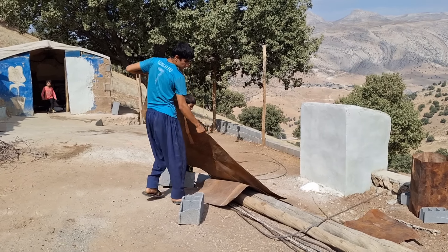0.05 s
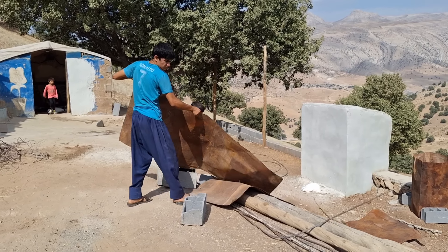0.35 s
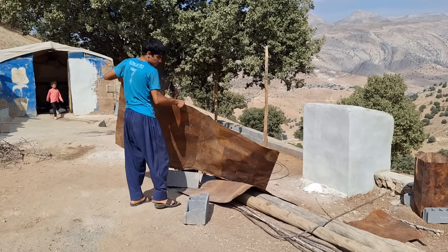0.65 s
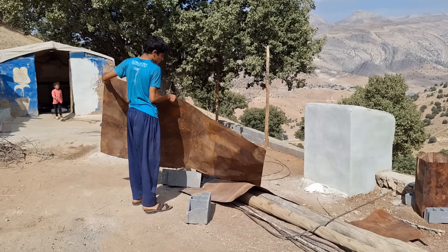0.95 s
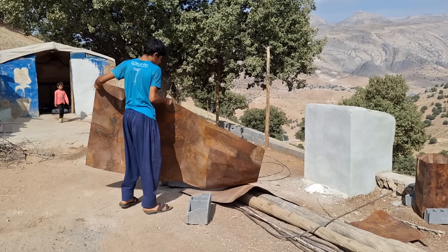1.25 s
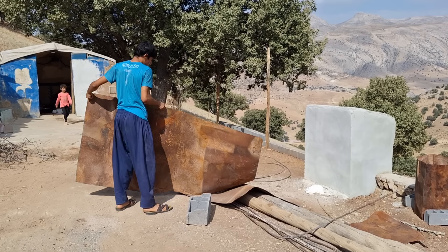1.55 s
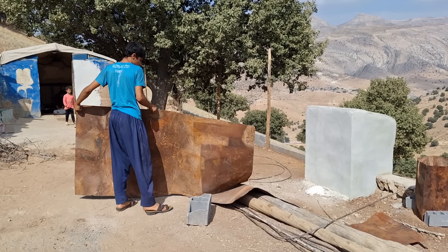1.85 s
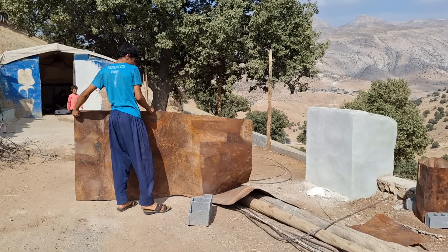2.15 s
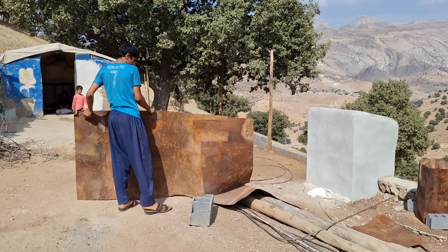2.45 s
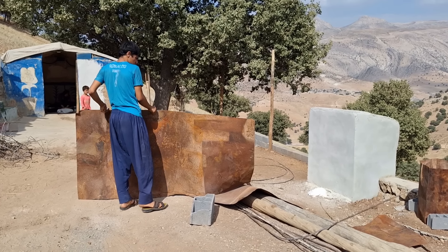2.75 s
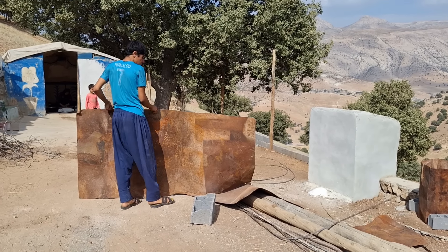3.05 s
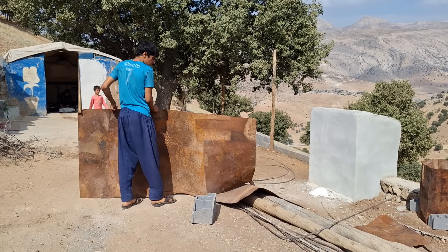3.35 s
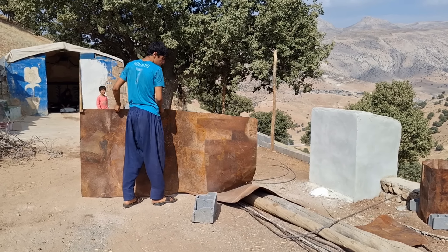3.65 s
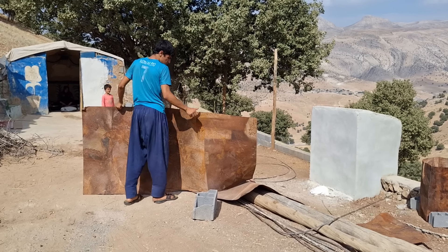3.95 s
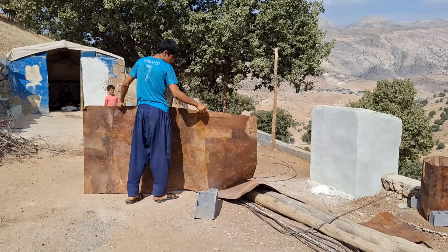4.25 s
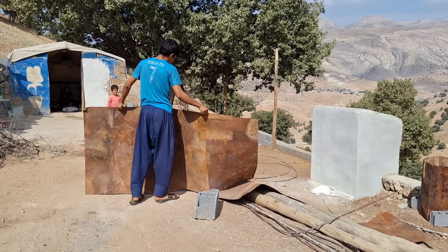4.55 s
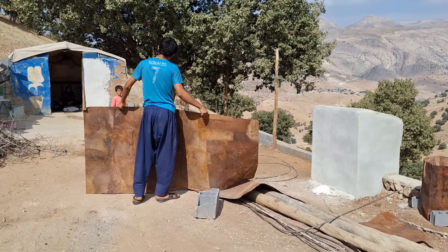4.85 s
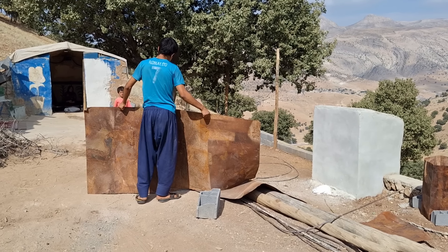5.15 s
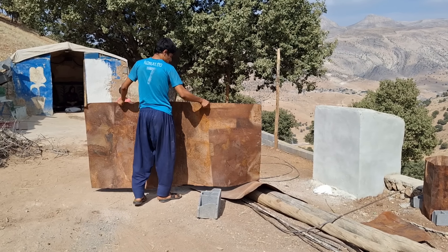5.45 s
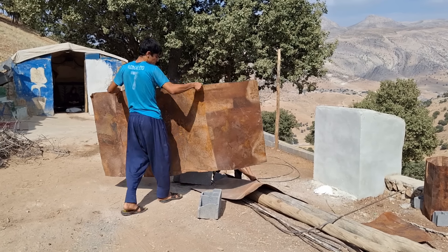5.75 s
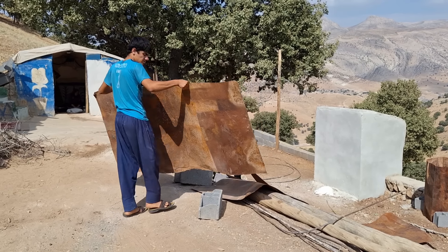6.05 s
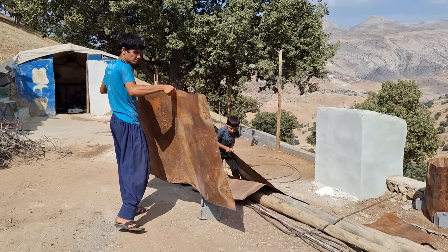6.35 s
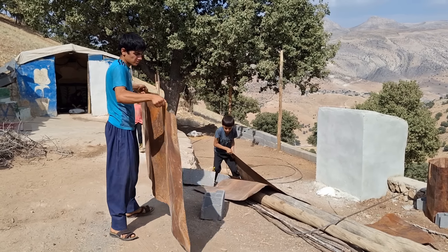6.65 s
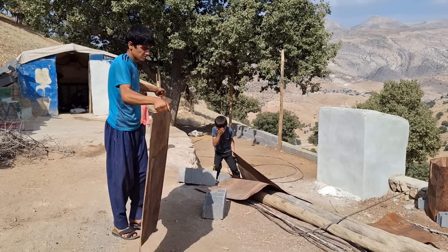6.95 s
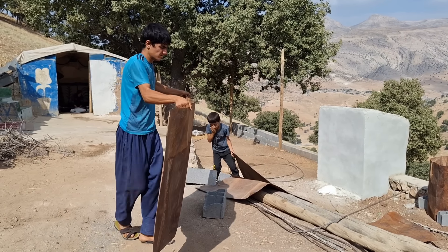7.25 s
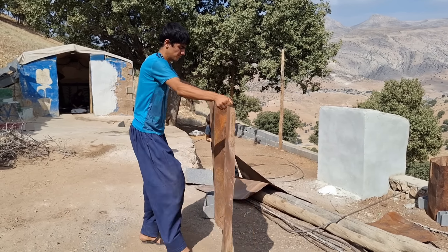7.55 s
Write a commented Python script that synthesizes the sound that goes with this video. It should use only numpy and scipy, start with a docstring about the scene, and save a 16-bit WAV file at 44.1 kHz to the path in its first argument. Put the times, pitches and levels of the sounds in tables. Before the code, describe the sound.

From the start a rusty iron sheet is dragged over a pile of sheets, booming, ringing and rasping, with short gritty scratches. It clangs loudly at about 1.1 and 1.5 seconds. From 1.9 to 3.2 seconds a sheep or goat, slightly to the right, gives one long, buzzy, wavering bleat that sags in pitch, while the sheet flexes with low booms. Quieter shifting and small ticks follow until about 5 seconds. At 5.2 the second drag begins with a hard grinding rasp, a clang near 5.6, and a brief, rough, high squeal around 6 seconds. The sheet settles with a softer boom, a scratch at 6.5 and a light knock near 7.1. Light wind rumbles and thumps on the microphone, mostly on the left, from 2 seconds on and strongest between 4 and 6, over a faint outdoor hush.

```python
"""Dragging a rusty iron sheet

In an open hillside yard, a rusty iron sheet is dragged, knocked and laid down on a pile of sheets.
Countless tiny slips make it boom, ring and rasp, and once its edge sticks and slips in a squeal.
Between two drags a sheep or goat gives one long, buzzy, wavering bleat: pulses ringing in its throat.
A light wind buffets the microphone over the faint hush of the hillside."""
import sys
import numpy as np
from scipy import signal
from scipy.fft import rfft, irfft
from scipy.io import wavfile
from scipy.ndimage import uniform_filter1d

SR = 44100
rng = np.random.default_rng(int(sys.argv[2]) if len(sys.argv) > 2 else 0)


def transcribe(u):
    """Save the signal u as a 16-bit wav file named by the first command-line argument.

    u: samples, shape (n,) or (channels, n), limited to [-1, 1]; the rate is SR.
    q: integer samples, one column per channel.
    """
    v = np.clip(np.atleast_2d(u).T, -1, 1)
    q = np.round(v * 32767).astype(np.int16)
    wavfile.write(sys.argv[1], SR, q)


N = 334710
T, HZ = np.arange(N) / SR, np.fft.rfftfreq(N, 1 / SR)

# Levels in all tables are relative. A fade is the time a sound takes to fall by 60 dB.
# The tone of the sheet's body (low) and edge (high). Each row: frequency in Hz, level in dB.
BODY_TONE = [(50, -13), (90, 0), (140, 4.5), (300, 1.5), (420, -3.5), (520, -8.5), (660, 2), (900, -1),
             (1150, -7.5), (1400, -6)]
EDGE_TONE = [(1800, -6.5), (2150, -14), (2600, -11.5), (3300, -12.5), (4500, -16.5), (6300, -24.5),
             (8400, -32.5), (9200, -31.5), (12500, -36), (16000, -41)]


def sheet_spectrum(grains_per_s, spread_db, grain_db, ripple_db=2):
    """The left and right spectrum of the sheet, shaken by tiny slips and some coarser grains."""
    # The main peaks and dips in the sheet's ring. Each row: frequency in Hz, width in Hz, gain in dB.
    ring_colour = [(157, 25, -1), (283, 25, 1.5), (770, 27, 3), (828, 24, 1.5), (980, 40, 2.5),
                   (1275, 16, 5.5), (1540, 55, -7), (1858, 66, 2.5), (2660, 77, 5), (3212, 50, 5.5)]
    # How alike left and right are. Each row: frequency in Hz, likeness from 0 to 1.
    likeness = [(60, .995), (300, .995), (750, .96), (1300, .85), (2200, .6), (4000, .65), (7000, .35),
                (14000, .4)]
    # How far the left side is ahead. Each row: frequency in Hz, phase in radians.
    left_lead = [(100, -0.8), (400, 0.52), (800, 0.55), (1100, 0.95), (1400, 1.66), (1900, 2.5), (2600, -2),
                 (3600, 1.2), (5500, 1.77), (8000, -1.7)]
    # How much louder the left side is. Each row: frequency in Hz, gap in dB.
    left_louder = [(80, 3), (250, 0), (750, 2), (1400, 3), (2300, 1.5), (3600, -2), (10000, -6.5)]
    sizes = amp(spread_db * np.minimum(rng.exponential(1, N), 4.5))
    grains = sizes * (rng.random(N) < grains_per_s / SR) * rng.standard_normal((2, N))
    left, other = rfft(rng.standard_normal((2, N)) + amp(grain_db) * grains / rms(grains))
    same, side = over_frequency(likeness), amp(over_frequency(left_louder) / 2)
    right = (same * left + np.sqrt(1 - same ** 2) * other) * np.exp(-1j * over_frequency(left_lead))
    ripple = uniform_filter1d(rng.standard_normal(len(HZ)), size=450)  # the crowded higher resonances
    colour_db = peaks_and_dips(ring_colour) + ripple_db * ripple / rms(ripple) * HZ / (HZ + 900)
    tone = amp(over_frequency(BODY_TONE + EDGE_TONE) + colour_db) * high_pass(40, 2)
    spectrum = np.array([left * side, right / side]) * tone
    return spectrum / rms(irfft(spectrum.mean(0), N))


def sliding(judder_db=0.93, judder_hz=35, lurch_db=0.23, lurch_hz=9):
    """The dragged sheet booms and rings; its edge rasps and hisses, lurching and juddering as it goes."""
    # Pulls and shoves over the pile. Each row: start, rise, hold and fade in seconds,
    # then the levels of boom, ring, rasp and grit in dB.
    slides = [(-.05, 0.036, 0.1, 1.1, -45, -43, -40.5, -49.5),
              (0.113, 0.059, .22, 0.95, -35.5, -44.5, -34.5, -46),
              (0.303, 0.12, 0.26, 2.2, -36.5, -33, -36.5, -48),
              (0.756, .15, 0.049, 0.49, -34.5, -34, -35, -48), (0.986, .08, 0.46, 1.1, -35, -43, -55, -62),
              (1.183, 0.15, 0.082, 0.24, -38, -35.5, -38.5, -48),
              (1.506, 0.15, .12, 1, -45, -49, -59.5, -72), (1.878, 0.02, 0.018, 1.2, -58, -46.5, -49, -73),
              (2.016, 0.018, 0.35, 1.3, -49, -54.5, -61, -76),
              (2.417, 0.07, 0.032, 0.65, -39.5, -53, -70, -82),
              (2.57, .035, 0.037, 1.14, -38.5, -43, -51, -66),
              (2.685, 0.11, 0.3, 0.76, -48.5, -56, -58, -72),
              (3.444, 0.057, 0.058, 0.97, -55.5, -68, -90, -100),
              (3.673, 0.021, 0.055, 1.5, -51, -57, -68.5, -75.5),
              (3.836, .13, 0.087, 1.9, -42.5, -47.5, -53, -62.5),
              (4.2, 0.09, 0.042, 0.3, -50, -54.5, -62, -73), (4.492, 0.11, 0.1, 0.9, -59.5, -68, -81, -92),
              (4.817, 0.061, 0.17, 0.85, -56, -67, -71.5, -84),
              (5.227, .13, .11, 0.23, -32.5, -34, -32, -47.5),
              (5.448, 0.075, 0.22, 1.06, -31, -38, -48.5, -63),
              (5.66, 0.29, .36, 0.73, -39.5, -44.5, -42.5, -50),
              (6.258, .15, .12, 0.89, -34.5, -44, -57.5, -82),
              (6.797, 0.097, 0.097, .8, -60.5, -78.5, -98.5, -88.5),
              (7.076, 0.061, 0.042, 1.02, -41, -49, -58.5, -67.5)]
    # The centres of the boom, ring, rasp and grit bands in Hz.
    centres = [250, 900, 3200, 9500]
    borders_hz = [100, 500, 1600, 5800, 16000]
    spectrum = sheet_spectrum(grains_per_s=700, spread_db=2.5, grain_db=-8)
    speeds = np.array([push(*row[:4]) for row in slides])
    levels = np.sqrt(amp([row[4:] for row in slides]).T ** 2 @ speeds ** 2)
    judder = amp(judder_db * waver(judder_hz) + lurch_db * waver(lurch_hz))
    out = np.zeros((2, N))
    for k, level in enumerate(levels):
        zone = irfft(spectrum.mean(0) * (HZ > borders_hz[k]) * (HZ < borders_hz[k + 1]), N)
        out += irfft(spectrum * band(centres, k), N) * level / rms(zone)
    return out * judder


def metal_rasp(moves, modes, level_db, judder_db, left_db):
    """Pressed hard, the rusty sheet judders and rings with a metallic rasp."""
    spectrum = sheet_spectrum(grains_per_s=1000, spread_db=-0.5, grain_db=1)
    flattened = spectrum / amp(over_frequency(BODY_TONE + EDGE_TONE))
    rasp = irfft(flattened * resonances(modes), N) * amp([[left_db / 2], [-left_db / 2]])
    return rasp / rms(rasp) * pushes(moves) * amp(level_db + judder_db * waver(80))


def face_rubbing():
    """The sheet's face rubs flat on the pile."""
    # The rubs. Each row: start, rise, hold and fade in seconds, level in dB.
    rubs = [(-.05, 0.15, .12, 1, -42), (.29, 0.04, .26, 1, -35), (.85, .07, .02, .5, -37)]
    # The face's resonances. Each row: frequency in Hz, width in Hz, level in dB.
    face_modes = [(1350, 230, -0.5), (1560, 140, 2), (1930, 180, -1.5)]
    return metal_rasp(rubs, face_modes, level_db=2.0, judder_db=2.0, left_db=9.0)


def edge_grinding():
    """The edge grinds hard over another sheet."""
    # The strokes. Each row: start, rise, hold and fade in seconds, level in dB.
    strokes = [(5.25, 0.038, .025, .22, -37.5), (5.35, 0.068, 0.036, 0.21, -26)]
    # The edge's resonances. Each row: frequency in Hz, width in Hz, level in dB.
    edge_modes = [(2580, 460, 5), (3230, 950, 9), (3900, 560, -5), (4420, 600, 6.5), (5200, 230, -12)]
    return metal_rasp(strokes, edge_modes, level_db=-3.0, judder_db=0.5, left_db=0.0)


def flexing(width_hz=18, left_db=0.9):
    """The whole sheet flaps and gives a low boom, higher in pitch when it is bent."""
    # The flexes. Each row: start, rise, hold and fade in seconds, level in dB, pitch in Hz.
    flexes = [(0.296, 0.2, .05, 1.2, -37.5, 70), (0.796, 0.22, 0.054, 1, -38.5, 81.3),
              (1.396, 0.066, 0.046, 0.99, -32, 65.8), (2.024, 0.012, 0.036, 1.2, -41, 111.7),
              (2.392, 0.068, 0.27, 2.22, -42, 117.9), (3.864, 0.12, 0.15, 1.02, -41, 147.6)]
    swing = waver(width_hz) + 1j * waver(width_hz)  # blurs each pitch into a narrow band of noise
    boom = np.zeros(N)
    for *timing, db, hz in flexes:
        boom += amp(db) * push(*timing) * (swing * np.exp(2j * np.pi * hz * T)).real
    return boom * amp([[left_db], [-left_db]])


def knocks(chatter_db=0.5, crack_db=-8, crack_fade_s=0.18):
    """Each blow cracks and sets the sheet ringing; the treble dies first and the loose sheets chatter."""
    # Blows and light bumps on the pile. Each row: start in seconds, level in dB,
    # treble cutoff in Hz, bass gain in dB, rise in seconds.
    blows = [(0.122, -34.5, 500, 6.5, 0.0027), (1.129, -16.5, 1420, -9.5, 0.0027),
             (1.197, -13, 1670, -12.5, 0.016), (1.446, -14, 6770, -4.5, 0.0049),
             (1.535, -22.5, 3300, -3.5, 0.0036), (2.04, -45.5, 450, 6.5, 0.0033),
             (3.692, -63, 3030, 2, .002), (4.795, -59.5, 1300, 13.5, 0.0022), (4.876, -53, 5000, -7, .002),
             (4.94, -57, 1510, 1, 0.0015), (5.064, -55.5, 4000, 2.5, .002),
             (5.588, -17.5, 1690, -9.5, 0.02), (5.655, -27, 1500, -6, .005), (6.617, -48, 1180, 3, 0.002),
             (6.725, -50, 1153, -1.5, 0.0012), (7.084, -42.5, 800, -2.5, 0.0085)]
    # Peaks and dips that colour the clang of a blow. Each row: frequency in Hz, width in Hz, gain in dB.
    clang_colour = [(346, 96, 2.5), (616, 270, -2.5), (930, 110, -1), (1340, 120, 0.5)]
    # How long the sheet rings. Each row: frequency in Hz, fade in seconds.
    ring_times = [(100, 1.2), (300, 0.74), (800, 0.57), (1400, 0.45), (2700, 0.27), (4500, 0.11),
                  (10000, 0.16)]
    spectrum = sheet_spectrum(grains_per_s=1600, spread_db=0.0, grain_db=-12.5)
    spectrum *= amp(peaks_and_dips(clang_colour))
    centres = [hz for hz, _ in ring_times]
    age, out = T[:SR], np.zeros((2, N))
    for k, (hz, fade_s) in enumerate(ring_times):
        power = np.zeros(N + SR)
        fade = amp(-60 * age / fade_s) + amp(crack_db - 60 * age / crack_fade_s)
        for start, db, cutoff_hz, bass_db, rise in blows:
            strength = amp(db + bass_db / (1 + (hz / 500) ** 4)) / np.sqrt(1 + (hz / cutoff_hz) ** 4)
            power[round(start * SR):][:SR] += (strength * np.minimum(age / rise, 1) * fade) ** 2
        out += irfft(spectrum * band(centres, k), N) * np.sqrt(power[:N])
    return out * amp(chatter_db * waver(90))


def grit_ticks(level_db=-6, low_cut_hz=3000, snap_db=3, snap_fade_s=0.0084, rise_s=0.0012):
    """Short bright scratches where the edge catches on grit and lets go with a snap; the one at 1.447 s is
    instead the bright crack of the heavy blow just before it."""
    # The catches, and at 1.447 s the bright crack of a blow. Each row: start in seconds, level in dB, fade in
    # seconds.
    catches = [(0.468, -32, 0.12), (0.7197, -25, 0.18), (0.9626, -33, 0.12), (1.3394, -30, 0.08),
               (1.385, -37.5, .07), (1.447, -24.5, 0.063), (1.537, -38, .08), (1.632, -50, 0.11),
               (1.75, -47.5, 0.17), (4.105, -44, 0.12), (4.5145, -60, 0.068), (4.733, -58, 0.077),
               (4.7586, -63, 0.083), (4.8758, -55.5, 0.21), (4.94, -59, .06), (4.9931, -70, 0.072),
               (5.064, -51, 0.31), (6.5173, -35.5, 0.19), (7.04, -62, 0.28), (7.1036, -52.5, 0.079),
               (7.4889, -67, 0.12)]
    spectrum = sheet_spectrum(grains_per_s=3000, spread_db=5.5, grain_db=-19)
    scratch = irfft(spectrum * high_pass(low_cut_hz, 2), N)
    force, age = np.zeros(N + SR), T[:SR]
    for start, db, fade_s in catches:
        fade = amp(-60 * age / fade_s) + amp(snap_db - 60 * age / snap_fade_s)
        force[round(start * SR):][:SR] += amp(db) * fade * np.minimum(age / rise_s, 1)
    return amp(level_db) * force[:N] * scratch / rms(scratch.mean(0))


def squeal(level_db=-1, octave_db=-17, jitter=0.03, flutter_db=2, ramp_s=0.0097):
    """The edge sticks and slips at one rough high pitch, with a weak tone an octave above."""
    # The squeal's course. Each row: time in seconds, level in dB, pitch in Hz.
    course = [(5.79, -45, 3834), (5.812, -41, 3780), (5.844, -34, 3840), (5.868, -39.5, 3810),
              (5.982, -22, 3720), (6.012, -34, 3810), (6.026, -29, 3660), (6.08, -36, 3820)]
    db, hz = over_time(course)
    gate = np.clip(np.minimum(T - course[0][0], course[-1][0] - T) / ramp_s, 0, 1)
    swell = amp(db - db.max())  # the octave grows faster than the squeal itself
    sides = []
    for side_db in (-1, 1):
        phase = 2 * np.pi * np.cumsum(hz * (1 + jitter * waver(262.5))) / SR
        tone = np.sin(phase) + amp(octave_db) * swell * np.sin(2 * phase)
        sides.append(tone * amp(db + level_db + side_db + flutter_db * waver(120)) * gate)
    return np.array(sides)


def vocal_folds(hz, closing, jitter=0.0031, hoarse_jitter=0.032, quaver=.0045, rasp_db=-10, dull_hz=4500):
    """The vocal folds snap shut in sharp pulses and let a puff of breath through at each opening."""
    # Cracks in the voice. Each row: time in seconds, half length in seconds, added share of noise.
    cracks = [(1.885, 0.063, 0.3), (2.538, 0.015, 0.04), (2.626, 0.019, 0.08), (3.092, 0.036, 0.32),
              (3.22, 0.061, 0.22)]
    cracking = sum(extra * bump((T - time) / half) for time, half, extra in cracks)
    hoarse = np.clip(.04 + .04 * closing + cracking, 0, 1)  # more noise as the mouth closes
    unsteady = 1 + (jitter + hoarse_jitter * hoarse) * waver(123.0) + quaver * waver(18.2)
    cycles = np.cumsum(hz * unsteady) / SR
    offset = ((cycles + .5) % 1 - .5) * SR / hz  # samples from the nearest closure
    pulses = np.sinc(offset) * np.exp(-(offset / 6) ** 2)
    puffs = rng.standard_normal(N) * np.exp(-(cycles % 1) / 2.1)
    buzz = (1 - hoarse) * pulses / rms(pulses) + hoarse * puffs / rms(puffs)
    soft = filtered(buzz, low_pass(dull_hz, 6))
    rasp = amp(rasp_db) * filtered(puffs, high_pass(dull_hz, 4)) / rms(puffs)
    strain_db = 3 - 9.5 * np.minimum(((T - 2.6) / .6) ** 2, 2)  # sharp in mid call, slack at the ends
    return soft + (buzz - soft + rasp) * amp(strain_db)


def bleat(level_db=-31.5, db_per_octave=34, shimmer_db=0.67, open_s=0.25, closing_s=0.99,
          rise_s=0.03, fade_s=0.084, right_delay_s=0.000456, echo_db=-20):
    """The animal's buzzing voice rings its throat and nose; the pitch sags as the mouth closes."""
    # The pitch, an arch that drops at the end. Each row: time in seconds, pitch in Hz.
    pitch = [(1.87, 186.6), (1.91, 171.6), (2.03, 189), (2.278, 195.3), (2.32, 191), (2.43, 195.1),
             (2.464, 188.2), (2.51, 195.6), (2.536, 184.7), (2.568, 194.4), (2.61, 185.3), (2.716, 186.5),
             (2.758, 183.6), (3.04, 175.1), (3.064, 169.7), (3.136, 170), (3.208, 160.4), (3.24, 152.5)]
    # Throat and nose resonances with the mouth open, then nearly shut.
    # Each row: frequency in Hz, width in Hz, level in dB.
    throat_open = [(1738, 210, -2), (2583, 294, -3.5), (3180, 670, -15), (3770, 810, -16), (4750, 790, -26),
                   (5300, 330, -19.5), (5920, 390, -18), (7500, 470, -40), (10400, 830, -49)]
    throat_shut = [(1685, 220, 1), (2730, 430, -8), (3146, 460, -5.5), (3790, 300, -13), (4630, 750, -21),
                   (5570, 450, -17), (6100, 190, -19), (7550, 930, -38), (10400, 1100, -36)]
    # The bleat on the left against the right. Each row: frequency in Hz, level in dB.
    left_shade = [(1700, -9.5), (2200, -7), (2900, -5.5), (3400, -8), (4500, -6), (6000, -7.5),
                  (10000, -19)]
    hz, = over_time(pitch)
    start, end = pitch[0][0], pitch[-1][0]
    closing = np.clip((T - start - open_s) / closing_s, 0, 1)
    gate = push(start, rise_s, end - start - rise_s, fade_s)
    effort_db = db_per_octave * np.log2(hz / hz.max())  # a harder push is both higher and louder
    buzz = vocal_folds(hz, closing)
    thin = high_pass(1430, 12)
    wide = filtered(buzz, ring_after(resonances(throat_open) * thin))
    shut = filtered(buzz, ring_after(resonances(throat_shut) * thin))
    voice = (1 - closing) * wide + closing * shut
    voice = voice / rms(voice[gate > .5]) * gate * amp(level_db + effort_db + shimmer_db * waver(70))
    sides = np.array([amp(over_frequency(left_shade)), np.exp(-2j * np.pi * HZ * right_delay_s)])
    return filtered(voice, sides) + amp(echo_db) * yard_echo(voice)


def yard_echo(sound, fade_s=0.26, dull_hz=2000, echoes_per_s=1500):
    """Thin outdoor echoes from walls, trees and ground, different on each side."""
    age = T[:SR]
    echoes = rng.standard_normal((2, SR)) * (rng.random((2, SR)) < echoes_per_s / SR)
    echoes *= amp(-60 * age / fade_s) * (age > .006)
    echoes = signal.lfilter([1], [1, -np.exp(-2 * np.pi * dull_hz / SR)], echoes)
    return signal.fftconvolve(sound[None], echoes / np.linalg.norm(echoes[0]), axes=1)[:, :N]


def wind(left_db=3, right_db=-11, breeze_db=-59, lumpy_db=3, thump_db=-1, thump_cycles=0.6):
    """Wind rumbles on the microphone, mostly on the windward left, and single swirls of air thump."""
    # The gusts. Each row: start, rise, hold and fade in seconds, level in dB.
    gusts = [(-.05, .04, 0.21, 1, -50), (2.02, 0.042, 0.046, 2.6, -39.5), (2.42, .1, 0.27, 1.5, -42.5),
             (3.66, 0.19, 0.29, 1, -47), (4.2, 0.092, 0.088, 0.75, -38), (4.48, .06, 0.32, 1.3, -39.5),
             (5.04, 0.09, 0.48, 0.83, -34.5), (5.64, 0.053, 0.018, 1.33, -27),
             (6.33, 0.043, .02, 0.77, -53), (7.08, .04, 0.16, .5, -61), (7.35, 0.04, .15, 0.26, -45)]
    # The thumps. Each row: time in seconds, level in dB, pitch in Hz.
    thumps = [(2.043, -32, 112), (2.696, -22, 62), (3.18, -31.5, 56), (3.447, -32.5, 79.5),
              (3.784, -33, 70), (4.169, -29, 51), (4.264, -25.5, 64), (4.752, -27, 76), (4.795, -26.5, 59),
              (5.094, -29.5, 64), (5.212, -26, 53.9), (5.687, -20.5, 54.3)]
    rumble = filtered(rng.standard_normal((2, N)), high_pass(42, 4) * low_pass(90, 6))
    rumble *= amp(lumpy_db * waver(20))
    local_level = np.sqrt(uniform_filter1d(rumble[0] ** 2, size=6000))
    rumble *= np.hypot(pushes(gusts), amp(breeze_db)) / local_level  # the gusts set the slow swells
    for time, db, hz in thumps:
        cycles = (T - time - .022) * hz
        wave = np.cos(2 * np.pi * (cycles + rng.random()))
        rumble += amp(db + thump_db) * bump(cycles / thump_cycles) * wave
    return rumble * amp([[left_db], [right_db]])


def hillside_hush(level_db=-68):
    """The faint steady hush of the hillside."""
    # The tone of the hush. Each row: frequency in Hz, level in dB.
    tone = [(40, -7), (100, 2.5), (290, -21), (550, -20), (740, -19.5), (1400, -47), (6300, -39),
            (9000, -50), (15500, -39)]
    hush = filtered(rng.standard_normal((2, N)), amp(over_frequency(tone)) * high_pass(150, 2))
    return amp(level_db) * hush / rms(hush)


def amp(db):
    """Turns decibels into a gain."""
    return 10 ** (np.asarray(db) / 20)


def rms(x):
    """The average strength of a signal (root mean square)."""
    return np.sqrt(np.mean(x ** 2) + 1e-20)


def over_frequency(points):
    """Joins (Hz, value) points into a curve on a log-frequency axis."""
    hz, value = np.transpose(points)
    return np.interp(np.log(HZ + 1), np.log(hz + 1), value)


def over_time(rows):
    """Joins (seconds, values..) rows into one curve for each value."""
    times, *columns = np.transpose(rows)
    return [np.interp(T, times, column) for column in columns]


def filtered(x, gain):
    """Filters x by a gain for each frequency."""
    return irfft(rfft(x) * gain, N)


def low_pass(hz, steepness):
    """Gains that keep what lies below hz."""
    return 1 / (1 + (HZ / hz) ** steepness)


def high_pass(hz, steepness):
    """Gains that keep what lies above hz."""
    return 1 - low_pass(hz, steepness)


def band(centres, k):
    """Band number k of a set of overlapping bands that add up to one."""
    return over_frequency(list(zip(centres, np.eye(len(centres))[k])))


def resonances(modes):
    """The gain of (Hz, width, dB) resonances at each frequency."""
    return sum(amp(db) / (1 + (2 * (HZ - hz) / width) ** 2) for hz, width, db in modes)


def peaks_and_dips(rows):
    """The decibels that (Hz, width, dB) rows add or take away at each frequency."""
    return sum(db / (1 + (2 * (HZ - hz) / width) ** 2) for hz, width, db in rows)


def ring_after(gain):
    """Gives a gain curve the phase that makes it ring after each pulse, not before."""
    fold = np.r_[1, np.full(N // 2 - 1, 2), np.zeros(N - N // 2)]
    return np.exp(rfft(irfft(np.log(gain + 1e-4), N) * fold))


def waver(hz):
    """A random wobble of strength 1, up to about the given rate."""
    wobble = filtered(rng.standard_normal(N), low_pass(hz, 4))
    return wobble / rms(wobble)


def bump(x):
    """A smooth hump of height 1 around x = 0."""
    return np.exp(-np.minimum(x ** 2, 50))


def push(start, rise, hold, fade):
    """The strength of one movement: it builds up, holds and dies away."""
    age = T - start
    return np.clip(age / rise, 0, 1) * amp(-60 * np.clip((age - rise - hold) / fade, 0, 3))


def pushes(rows):
    """The joint strength of (start, rise, hold, fade, dB) movements."""
    return np.sqrt(sum((amp(db) * push(*timing)) ** 2 for *timing, db in rows))


def scene():
    """Sheet, animal, wind and hillside together."""
    sheet = face_rubbing() + edge_grinding() + sliding() + flexing() + knocks() + grit_ticks() + squeal()
    return sheet + bleat() + wind() + hillside_hush()


def record(dry):
    """Cuts the very highest treble, above 15950 Hz."""
    treble_cut = signal.firwin(511, 15950, window=("kaiser", 9), fs=SR)
    return signal.oaconvolve(dry, treble_cut[None], "same")


dry = scene()
out = record(dry)
transcribe(out)
```